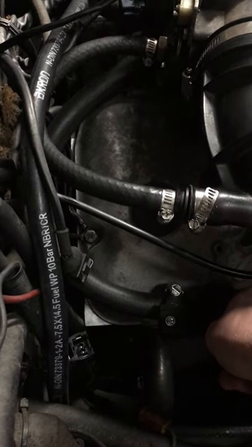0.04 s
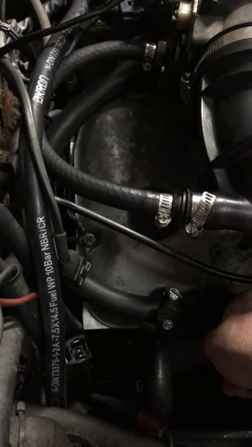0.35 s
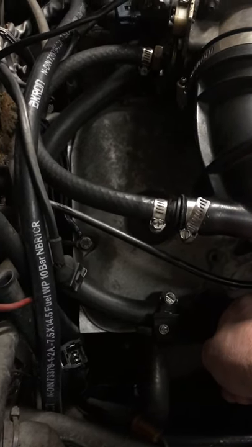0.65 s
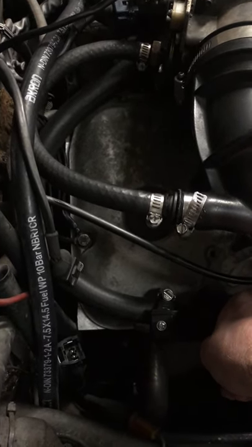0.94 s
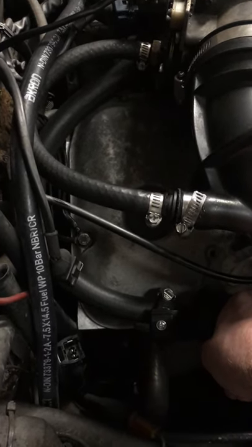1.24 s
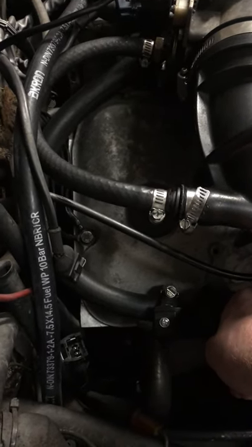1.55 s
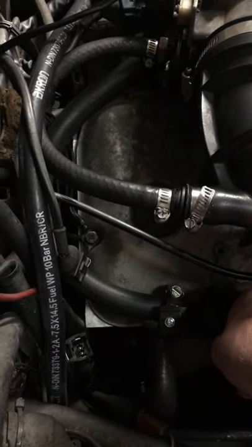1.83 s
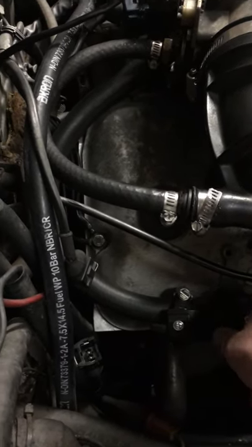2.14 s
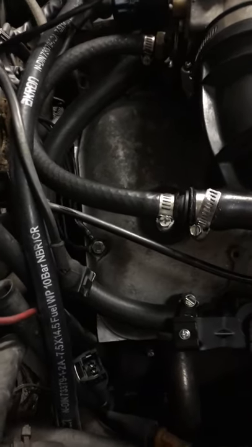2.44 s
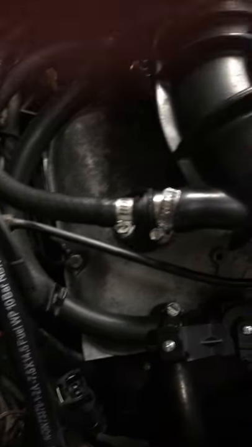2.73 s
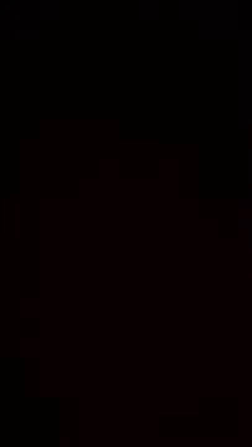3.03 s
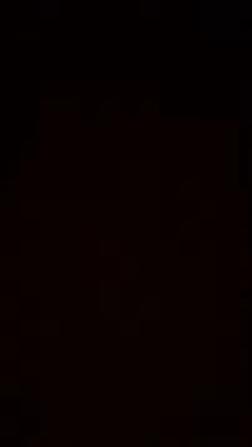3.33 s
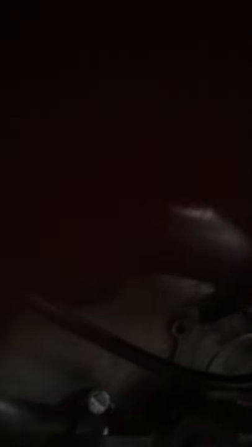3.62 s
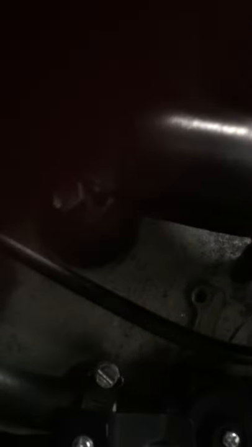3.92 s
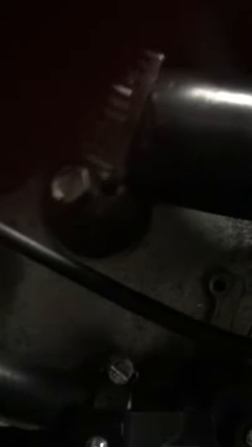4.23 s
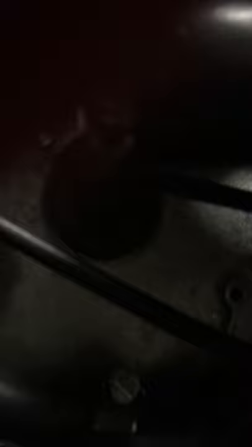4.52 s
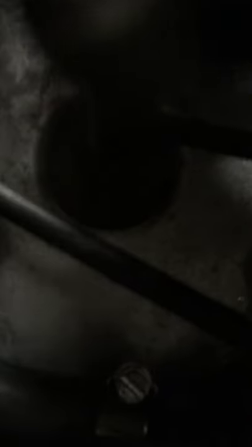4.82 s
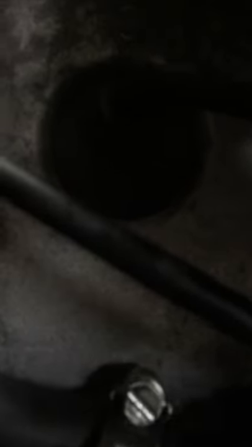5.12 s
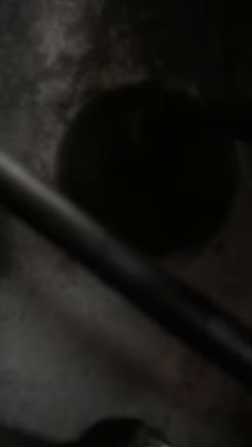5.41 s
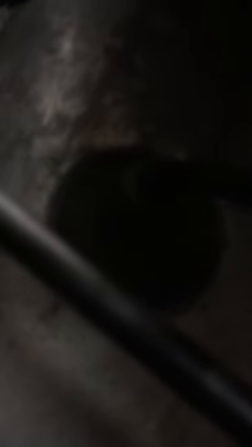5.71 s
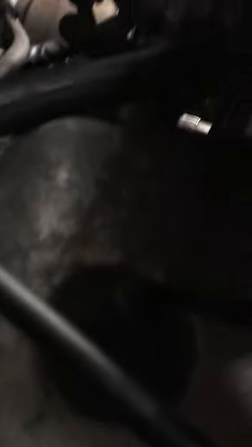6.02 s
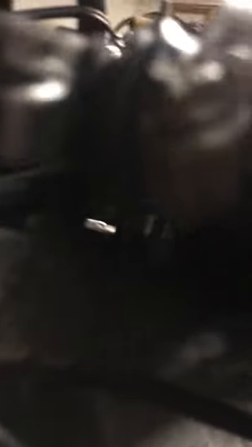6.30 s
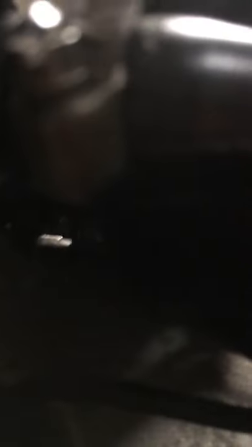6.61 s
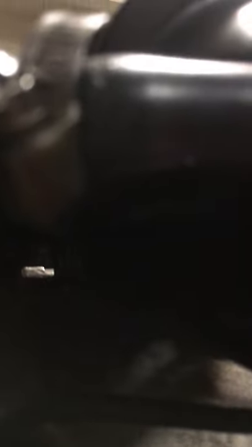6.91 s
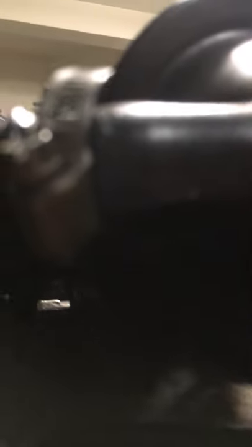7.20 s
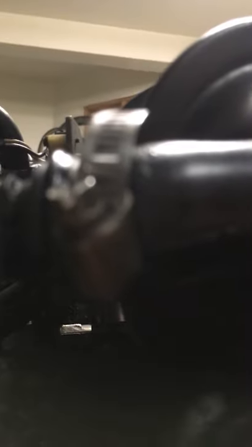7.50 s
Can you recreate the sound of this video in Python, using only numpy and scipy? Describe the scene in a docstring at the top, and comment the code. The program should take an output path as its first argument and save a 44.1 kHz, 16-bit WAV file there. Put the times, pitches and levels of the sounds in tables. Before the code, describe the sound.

Heard from inside a car's engine bay in a garage, a fast-idling engine gives a dull knock and a short rattle as its pitch sinks to a steady slow idle. Rumble and rapid clatter continue over a faint whine, while bright ticks and pulsing hiss sharpen as the microphone approaches. Near the end a low thump seals the microphone, the level drops suddenly, and a few soft bumps follow.

```python
"""A garage, inside a car's engine bay: a six-cylinder engine falls from fast to slow idle.
Each cycle brings exhaust rumble, valve blows on the block, a tappet tick and a hissing spit,
over a soft belt whine. A loose part rattles as the falling speed passes its resonance.
The microphone nears the cylinder head, then is abruptly covered and softly bumped a few times."""
import sys
import numpy as np
from scipy import signal
from scipy.fft import rfft, irfft
from scipy.io import wavfile
from scipy.ndimage import uniform_filter1d

SR = 44100
rng = np.random.default_rng(int(sys.argv[2]) if len(sys.argv) > 2 else 0)


def to_wav(sig):
    """Store sig (one row per channel, or 1-D mono) as 16-bit WAV at the path in sys.argv[1].

    Samples outside -1..1 are clipped; the rate is SR.
    """
    pcm = np.clip(np.atleast_2d(sig), -1, 1) * 32767
    pcm = np.round(pcm).astype(np.int16)
    wavfile.write(sys.argv[1], SR, pcm.T)  # frames by channels


N = 332955
TIME = np.arange(N) / SR

# engine speed (time [s], speed [rpm])
SPEED_RPM = [(0, 2150.5), (.45, 1920.2), (1.3, 1422.8), (1.9, 1165.4), (2.9, 1081.9), (4.4, 1052.9),
             (5.7, 1068.4), (6.6, 1074.7)]
# microphone path (time [s], nearness to the cylinder head [0-1])
NEARNESS = [(0, 0.05), (1.5, 0), (2.9, 0.21), (3.7, 0.59), (4.4, 0.64), (5.2, 0.83), (6.6, 0.94)]
# gain laws (far at slow idle [dB], added at the head [dB], added per speed doubling [dB])
RUMBLE_DB, CLATTER_DB, TAPPET_DB = (-30.5, 2.2, 1.5), (-41, 4.52, 4.13), (-52.5, 6.9, -4.5)
HISS_DB, SPIT_DB, WHINE_DB = (-42.5, 9.6, -0.36), (-0.37, 7.6, -11), (-7.5, 10.2, 1)

# engine orders, from 3 times the cycle rate up (level [dB])
ORDER_DB = [-0.5, -1.5, 0, 9.5, 6, 1, 6, 4, 2, 10.5, 6.5, -7.5, 3.5, -1.5, 5, -2, 7, 0.5, 4.5, -5.5, 6, -4,
            2, -14, 9, 7, -8.5, 1.5, 7, -5.5, 2.5, 4]
# exhaust beats (phase [cycles], level [dB], half length [s])
EXHAUST_BEATS = [(.695, -6, .001), (.875, -1.5, .0014), (.035, -3, .0015), (.185, 1, .002), (.34, 2, .0026),
                 (.55, -1, .002)]
# bay response (frequency [Hz], gain [dB])
BAY_EQ = [(20, -62), (31, -60.5), (43, -55.5), (53, -44), (64, -42.5), (78, -41.5), (100, -47.5),
          (124, -44), (156, -53), (198, -53.5), (226, -50), (256, -48), (305, -55.5), (405, -66),
          (600, -63), (770, -56), (900, -90)]
# standing waves in the bay (frequency [Hz], width [Hz], lift far [dB], lift near [dB])
BAY_MODES = [(59.2, 7, 8.5, 2), (81, 38, 2, 8), (124.2, 22, 6.5, 2), (170, 39, -13.5, 8.5),
             (193.6, 18, 17.5, 2), (249, 39, 4.5, 9.5), (300, 28, 6.5, -8), (362.5, 48, 8, -4)]

# valve and piston blows (phase [cycles], level [dB])
VALVE_BLOWS = [(.037, 1), (.097, -1.5), (.152, 1), (.197, 2), (.258, 2), (.315, -5.5), (.377, -3), (.41, 0),
               (.452, -2.5), (.51, -10), (.557, -0.5), (.61, -2.5), (.668, -4.5), (.718, 0.5), (.78, -3),
               (.835, -2), (.893, -0.5), (.942, 0), (.988, 2)]
# block response (frequency [Hz], gain [dB])
BLOCK_EQ = [(36, -35), (56, -29), (125, 1), (275, 13.5), (355, 7.5), (485, -1), (735, -6), (1120, -2),
            (1820, -2.5), (2420, -9), (3420, -11), (4850, -11), (15000, -29)]
# block and cover ringing: far, mid-bay, at the head (frequency [Hz], width [Hz], lift [dB])
BLOCK_FAR_MODES = [(396.4, 21, 10), (619, 142, 14.5), (970, 256, 12), (1171, 90, 10.5), (1482, 250, 9),
                   (1668, 51, 9.5), (1990, 200, 8), (2620, 72, 7.5)]
BLOCK_MID_MODES = [(404, 35, 6.5), (483, 45, 9), (564, 43, 14.5), (630, 60, 17.5), (922, 170, 13),
                   (1094, 103, 11), (1178, 69, 12.5), (1525, 220, 9.5), (1685, 69, 9.5), (2090, 180, 13.5),
                   (2780, 600, -4)]
BLOCK_NEAR_MODES = [(415.4, 65, 8.9), (479.5, 38, 8.3), (573, 106, 11.6), (648, 37, 9.7), (916, 154, 11.5),
                    (1280, 246, 9.5), (1570, 270, 5.5), (1920, 250, 6.9), (2580, 670, 5.2)]
# valve gear rasp and tappet tick spectra (frequency [Hz], gain [dB])
RASP_EQ = [(850, -20.5), (2200, 8), (2700, 8), (3450, 5.5), (4100, 4), (4800, -8), (6200, -3),
           (12000, -21.5)]
TAPPET_EQ = [(1200, -26), (2500, -6.5), (3300, 0), (4300, -3), (5300, -11), (14000, -9.5)]
# their ringing (frequency [Hz], width [Hz], lift [dB])
RASP_MODES = [(1880, 120, 4.2), (2720, 140, 5.1), (3300, 220, 5.8), (5500, 300, 7.6)]
TAPPET_MODES = [(3760, 260, 5), (4370, 160, 0)]

# steady hiss and spit spectra (frequency [Hz], gain [dB])
HISS_EQ = [(1600, -53.5), (4100, -14), (5050, -14), (6150, -2), (7850, -5.5), (8750, -3), (9850, -4),
           (10400, -9.5), (11100, -6), (13500, -6), (15600, -7.5)]
SPIT_EQ = [(1100, -47.5), (3100, -13.5), (5050, -12.5), (6050, -7.5), (8050, -8.5), (8950, -5.5),
           (9600, -5), (10350, -6.5), (11250, -3), (13100, -2), (14600, 0)]
# metal ringing in the spits (frequency [Hz], width [Hz], lift [dB])
SPIT_MODES = [(6080, 140, 5.5), (8630, 130, 2), (15030, 150, 2)]
# harder spits (time [s], boost [dB])
SPIT_ACCENTS = [(3.31, 1.5), (3.646, 0), (3.869, 1.5), (4.666, 0), (4.778, 1), (5.006, 1), (5.684, 1.5),
                (6.132, 1.5), (6.468, 1), (6.581, 0)]

# belt-driven tones (frequency [multiples of the cycle rate], level [dB])
BELT_TONES = [(36, -48.5), (45, -51), (54, -59.5), (63.65, -51.5), (72.8, -57.5), (109, -55)]
# noise floor spectrum (frequency [Hz], gain [dB])
FLOOR_EQ = [(18, -45.5), (30, -12), (71, 3), (192, 3.5), (505, -7.5), (945, -6), (2020, -17), (3400, -32.5),
            (4910, -35), (5450, -17.5), (15500, -36)]
# dull engine knocks (time [s], level [dB])
KNOCKS = [(0.872, -32), (0.879, -14)]
# loose part's ringing (frequency [Hz], gain [dB])
RATTLE_EQ = [(700, -22.5), (1700, 2), (2350, 6), (3000, 5.5), (5000, -26.5), (12000, -38)]
# leak into the covered microphone (frequency [Hz], gain [dB])
LEAK_EQ = [(60, -50), (160, -56), (410, -45), (1050, -54), (2050, -39), (3350, -31), (4850, -35.5),
           (6050, -43), (14000, -46.5)]
# bumps on the covered microphone (time [s], level [dB], pitch [Hz])
BUMPS = [(6.689, -38, 755), (7.1736, -29.5, 970), (7.214, -51, 450), (7.325, -38.5, 814)]


def gain_of(db):
    """Decibels to gain."""
    return 10 ** (np.asarray(db) / 20)


def unit_rms(x):
    """Scales to rms 1."""
    return x / np.sqrt(np.mean(x ** 2) + 1e-20)


def curve(rows):
    """A time table at every sample."""
    return np.interp(TIME, *np.transpose(rows))


def response_db(eq, hz, modes=()):
    """Broad spectrum on a log-frequency axis, plus resonance peaks."""
    f, db = np.transpose(eq)
    peaks_db = sum(lift / (1 + (2 * (hz - centre) / width) ** 2) for centre, width, lift in modes)
    return np.interp(np.log(hz + 1), np.log(f + 1), db) + peaks_db


def colour(x, eq, modes=(), size=4096):
    """Minimum-phase filter from a spectrum and resonances."""
    db = response_db(eq, abs(np.fft.fftfreq(size, 1 / SR)), modes)
    response = np.exp(np.conj(signal.hilbert(np.log(gain_of(db)))))
    return signal.oaconvolve(x, np.fft.ifft(response).real[:size // 2])[:N]


def noise():
    """White noise."""
    return rng.standard_normal(N)


def per_cycle(cycles, count=128):
    """One random value per engine cycle, interpolated."""
    return np.interp(cycles + 1, np.arange(count), rng.standard_normal(count))


def levelled(x, lo_hz, hi_hz):
    """Divides by one band's slow rms; the beat within each cycle stays."""
    band = signal.sosfilt(signal.butter(2, [lo_hz, hi_hz], "band", fs=SR, output="sos"), x)
    power = uniform_filter1d(uniform_filter1d(band ** 2, SR // 3), SR // 9)
    return x / np.sqrt(power + 1e-12)


def loudness(law, cycle_hz, near):
    """A part's gain from nearness and engine speed."""
    idle_db, near_db, doubling_db = law
    return gain_of(idle_db + near_db * near + doubling_db * np.log2(cycle_hz / cycle_hz[-1]))


def rumble(cycles, cycle_hz, near, delay_s=.041, hum_orders=(26, 27, 28, 29), hum_phase=.72):
    """Exhaust beats make orders that slide through the bay's standing waves; no two cycles burn alike."""
    orders, step = np.zeros(N), slice(None, None, 64)
    late = cycles - delay_s * cycle_hz  # path via exhaust and garage
    turns, far = late[step], 1 - near[step]
    unevenness = .07 + .075 * far
    modes = [(f, width, near_db + far * (far_db - near_db)) for f, width, far_db, near_db in BAY_MODES]
    phase, beat_db, half_s = np.transpose(EXHAUST_BEATS)
    for k, db in enumerate(ORDER_DB, 3):
        firing_db = far * (k % len(EXHAUST_BEATS) == 0)  # firing orders stand out from afar
        level = gain_of(db + response_db(BAY_EQ, k * cycle_hz[step], modes) + firing_db)
        level *= 1 + unevenness * per_cycle(turns)
        beats = gain_of(beat_db) * np.exp(-(np.pi * k * cycle_hz[-1] * half_s) ** 2)
        exhaust_phase = np.angle(-np.sum(beats * np.exp(-2j * np.pi * k * phase))) / (2 * np.pi)
        # hum orders swell together as the nearer cylinders fire
        start = -k * hum_phase if k in hum_orders else exhaust_phase
        drift = np.interp(TIME, TIME[step], start + .003 * np.sqrt(k) * per_cycle(turns))
        orders += np.interp(TIME, TIME[step], level) * np.cos(2 * np.pi * (k * late + drift))
    churning_air = loudness((-16, 0, 3), cycle_hz, near) * unit_rms(colour(noise(), BAY_EQ))
    return loudness(RUMBLE_DB, cycle_hz, near) * levelled(unit_rms(orders) + churning_air, 40, 300)


def strikes(cycles, phase, decay_s=.0016, jitter_s=.00007, uneven_db=.7, size=1024):
    """A part lands once a cycle with its own crack; timing and force vary slightly."""
    age_s = (np.arange(size) - size / 2) / SR
    burst = rng.standard_normal(size) * (age_s >= 0) * np.exp(-abs(age_s) / decay_s)
    crack = irfft(np.exp(1j * np.angle(rfft(burst))), size)  # flat spectrum
    at = np.flatnonzero(np.diff(np.floor(cycles - phase)))
    slip, force = rng.standard_normal((2, 128))[:, :len(at)]
    train = np.zeros(N)
    train[np.clip(at + (jitter_s * SR * slip).astype(int), 0, N - 1)] = gain_of(uneven_db * force)
    return signal.oaconvolve(train, crack, "same")


def clatter(cycles, cycle_hz, near, slide_db=-5, rasp_db=-11, decay_cycles=.036):
    """Valves and pistons ring the block over sliding metal; the valve gear rasps more at speed."""
    turn = np.linspace(0, 1, 400)
    tails = sum(gain_of(db) * np.exp(-((turn - phase) % 1) / decay_cycles) for phase, db in VALVE_BLOWS)
    envelope = unit_rms(np.interp(cycles % 1, turn, 1 + tails))
    impacts = unit_rms(sum(gain_of(db) * strikes(cycles, phase) for phase, db in VALVE_BLOWS))
    drive = impacts + gain_of(slide_db) * envelope * noise()
    shares = [np.interp(near, [.081, .57, .8], row) for row in np.eye(3)]
    mode_sets = BLOCK_FAR_MODES, BLOCK_MID_MODES, BLOCK_NEAR_MODES
    block = sum(share * colour(drive, BLOCK_EQ, modes) for share, modes in zip(shares, mode_sets))
    rasp = colour(envelope * noise(), RASP_EQ, RASP_MODES)
    rasp *= gain_of(rasp_db) * (cycle_hz / cycle_hz[-1]) ** 1.34
    return loudness(CLATTER_DB, cycle_hz, near) * levelled(block + rasp, 450, 2500)


def bursts(cycles, cycle_hz, phase, decay_s, uneven_db):
    """One decaying noise burst per cycle."""
    number, part = np.divmod(cycles - phase + 2, 1)
    decaying = noise() * np.exp(-part / cycle_hz / decay_s)
    return decaying * gain_of(uneven_db * rng.standard_normal(128))[number.astype(int)]


def tappets(cycles, cycle_hz, near):
    """A loose tappet ticks brightly; a drier click follows the hard spit."""
    tapping = strikes(cycles, phase=.6, decay_s=.0055, size=4096)
    clicking = bursts(cycles, cycle_hz, phase=.072, decay_s=.0006, uneven_db=1.2)
    tick = unit_rms(colour(tapping, TAPPET_EQ, TAPPET_MODES))
    click = unit_rms(colour(clicking, [(165, -13.5), (630, -14), (2150, -14), (5100, -34), (14000, -28)]))
    return loudness(TAPPET_DB, cycle_hz, near) * tick + gain_of(-60 + 9.6 * near) * click


def shimmer(x, cycles, depth_db=3.3, bands=18):
    """Treble colour shifts from cycle to cycle, band by band."""
    hz, centres_hz = np.fft.rfftfreq(N, 1 / SR), np.linspace(4000, 16000, bands)
    spectrum = rfft(x)
    split = (irfft(spectrum * np.interp(hz, centres_hz, row), N) for row in np.eye(bands))
    return sum(band * gain_of(depth_db * np.tanh(per_cycle(cycles))) for band in split)


def spits(cycles, pump_beats=9, accent_s=.012):
    """Pump beats spit crackling hiss: one hard per cycle, the rest weak."""
    weak_phases = .064 + np.arange(pump_beats - 1) / pump_beats
    # (phase [cycles], level [dB], half length [cycles])
    hard = [(.96, 21.85, .035)]
    weak = [(phase, 10 - 3 * np.cos(2 * np.pi * (phase - .52)), .037) for phase in weak_phases]
    power = 0
    for phase, db, half_cycles in hard + weak:
        offset = (cycles - phase + .5) % 1 - .5
        width = half_cycles * np.where(offset < 0, .55, 1.3)  # fast rise, slow fall
        chance_db = 1.2 * np.tanh(per_cycle(cycles - phase + 1))
        power += gain_of(db + chance_db) ** 2 * np.exp(-(offset / width) ** 2)
    accent_db = sum(db * np.exp(-((TIME - s) / accent_s) ** 2) for s, db in SPIT_ACCENTS)
    crackle = np.exp(.5 * np.tanh(unit_rms(uniform_filter1d(noise(), size=24))))
    drive = unit_rms(noise() * crackle) * np.sqrt(power) * gain_of(accent_db)
    return shimmer(colour(drive, SPIT_EQ, SPIT_MODES), cycles)


def wall_echo(x, size=320, positions=7):
    """Close metal walls add a dense, short echo; its colour shifts as the microphone moves."""
    echo = 0
    for row in np.eye(positions):
        taps = rng.standard_normal(size) * np.exp(-np.arange(size) / (size / 3))
        taps *= .38 / np.linalg.norm(taps)
        share = np.interp(TIME, np.linspace(0, TIME[-1], positions), row)
        echo += np.sqrt(share) * signal.oaconvolve(x, np.r_[np.zeros(size // 10), taps])[:N]
    return x + echo


def hiss(cycles, cycle_hz, near):
    """Fine hiss plus spits; from afar the band around 6.5 kHz is shaded."""
    spitting = loudness(SPIT_DB, cycle_hz, near) * spits(cycles)
    steady = gain_of(9.5 - np.cos(2 * np.pi * (cycles - .56))) * colour(noise(), HISS_EQ)
    close = wall_echo(steady + spitting)
    shaded = colour(close, [(4000, 0), (6500, -7), (10000, -3.5), (14000, 0)])
    return loudness(HISS_DB, cycle_hz, near) * levelled(near * close + (1 - near) * shaded, 8000, 16000)


def belt_whine(cycles, cycle_hz, near, waver_db=2, wobble_turns=.13):
    """Belt-driven parts sing clean, slightly wavering tones."""
    tones = 0
    for k, db in BELT_TONES:
        level = gain_of(db + waver_db * per_cycle(cycles))
        turns = k * cycles + rng.random() + wobble_turns * per_cycle(cycles)
        tones += level * np.sin(2 * np.pi * turns)
    return loudness(WHINE_DB, cycle_hz, near) * np.sqrt(2) * tones


def noise_floor(level_db=-68.5):
    """Faint, steady, mostly low noise."""
    return gain_of(level_db) * unit_rms(colour(noise(), FLOOR_EQ))


def ring(start_s, hz, decay_s):
    """Damped sine."""
    age_s = np.maximum(TIME - start_s, 0)
    return -np.sin(2 * np.pi * hz * age_s) * np.exp(-age_s / decay_s)


def knocks():
    """Dull knocks in the engine."""
    return sum(gain_of(db) * ring(s, hz=115, decay_s=.019) for s, db in KNOCKS)


def rattle(cycles, cycle_hz, resonance_rpm=1264, width_rpm=190, level_db=-49):
    """A loose part knocks once a cycle while the speed passes its resonance."""
    shaken = np.exp(-((curve(SPEED_RPM) - resonance_rpm) / width_rpm) ** 2)
    knocking = bursts(cycles, cycle_hz, phase=.9, decay_s=.0081, uneven_db=0)
    return gain_of(level_db) * shaken * unit_rms(colour(knocking, RATTLE_EQ))


def covered(x, shut_s=6.646, closing_s=.0037):
    """The microphone port is sealed with a low thump, probably by a finger; a faint leak remains."""
    opening = np.exp(-np.maximum(TIME - shut_s, 0) / closing_s)
    thump = gain_of(-14.5) * ring(shut_s - .004, hz=80, decay_s=.0069)
    return x * opening + (1 - opening) * colour(x, LEAK_EQ) + thump


def bumps():
    """Soft bumps on the covered microphone."""
    taps = sum(gain_of(db) * (ring(s, hz, .00095) + .26 * ring(s, 130, .0018)) for s, db, hz in BUMPS)
    return colour(taps, [(45, -5), (210, 8.5), (2700, -7.5), (4100, -19), (11000, -40)])


def scene():
    """Mono mix; one crank angle drives all cyclic sounds."""
    cycle_hz = curve(SPEED_RPM) / (2 * 60)  # two crank turns per cycle
    cycles = np.cumsum(cycle_hz) / SR - .026
    near = curve(NEARNESS)
    engine = sum(part(cycles, cycle_hz, near) for part in (rumble, clatter, tappets, hiss, belt_whine))
    engine += knocks() + rattle(cycles, cycle_hz)
    return (covered(engine) + bumps() + noise_floor())[None]


def record(dry, low_hz=40, high_hz=15850):
    """Bass cut and band limit."""
    lean = signal.sosfilt(signal.butter(4, low_hz, "high", fs=SR, output="sos"), dry)
    lowpass = signal.firwin(301, high_hz, window=("kaiser", 7), fs=SR)
    return signal.oaconvolve(lean, lowpass[None], "same", axes=1)


dry = scene()
out = record(dry)
to_wav(out)
```